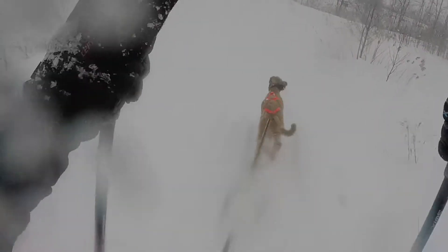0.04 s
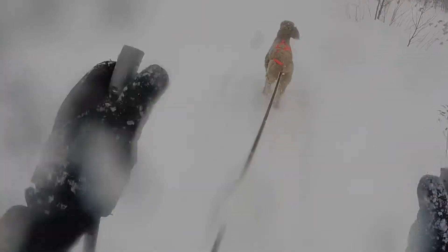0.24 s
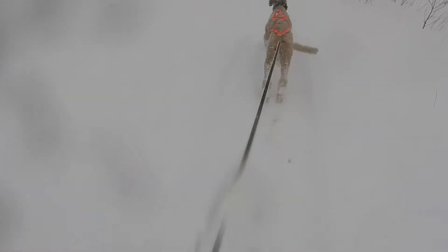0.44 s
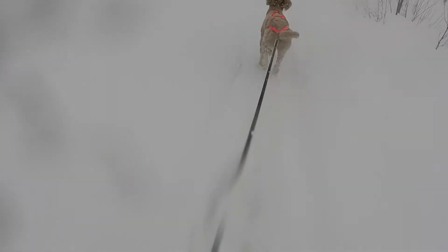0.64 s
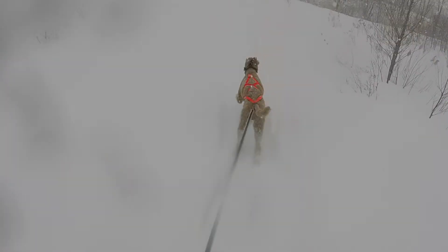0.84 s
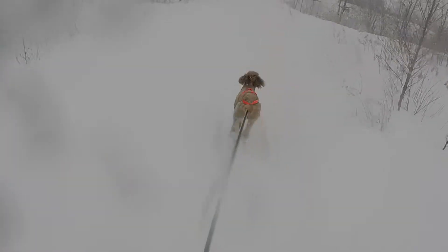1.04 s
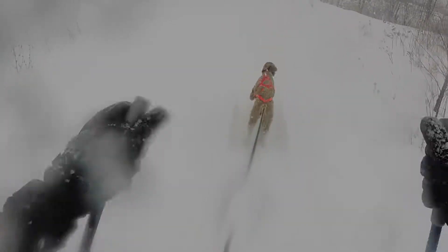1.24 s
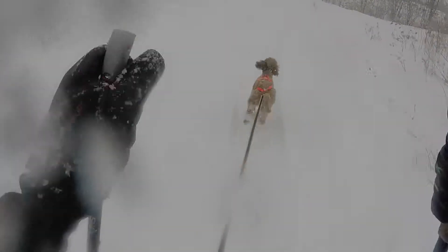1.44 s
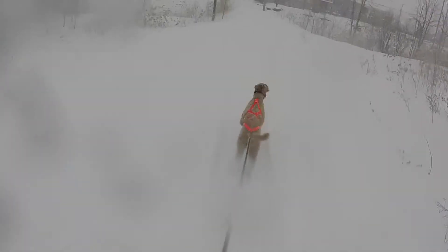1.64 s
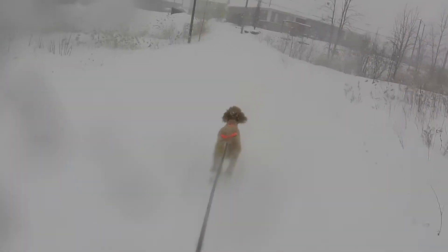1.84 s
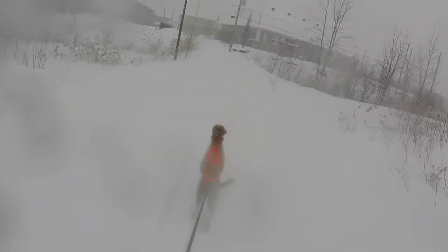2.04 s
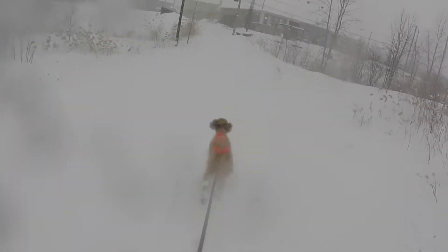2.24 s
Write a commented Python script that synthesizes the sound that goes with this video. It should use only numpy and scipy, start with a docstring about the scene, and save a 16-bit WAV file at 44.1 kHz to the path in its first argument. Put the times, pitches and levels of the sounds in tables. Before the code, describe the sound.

Skiing on snow with short crunches, icy ticks, pole clicks and low wind.

```python
"""Skiing through falling snow

On the slope behind a dog, heard from the microphone of a camera worn on the body.
Icy grains tick on the housing, right at the microphone; at arm's length, poles and gear knock,
click and give a few louder clacks. Underfoot, snow crunches in bursts of tiny fractures and the
skis glide with a soft, grainy hiss. Wind on the microphone lays a low rumble under it all."""
import sys
import numpy as np
from scipy.fft import rfft, irfft, next_fast_len
from scipy.io import wavfile
from scipy.ndimage import uniform_filter1d

SR = 44100
rng = np.random.default_rng(int(sys.argv[2]) if len(sys.argv) > 2 else 0)


def int16_out(signal):
    """Quantize to a 16-bit WAV file."""
    q = np.round(np.clip(np.atleast_2d(signal).T, -1, 1) * 32767)
    wavfile.write(sys.argv[1], SR, q.astype(np.int16))


N = 101429

# wind on the microphone: (time [s], level [dB])
WIND_LEVEL = [(.18, -53), (.3, -39.5), (.39, -38), (.45, -28.5), (.53, -46.5), (.64, -33), (.78, -43.5),
              (.95, -39.5), (1.06, -53), (1.12, -33), (1.2, -44.5), (1.33, -43), (1.55, -45.5), (1.63, -36),
              (1.73, -41), (1.83, -33.5), (1.95, -42.5), (2.3, -47)]
# colour of its rumble: (frequency [Hz], level [dB])
WIND_SPECTRUM = [(14, -9), (36, -1.5), (62, -18.5), (100, -37), (1000, -88)]
# still air over the slope: (frequency [Hz], level [dB])
AIR_SPECTRUM = [(100, 0.5), (500, -10), (3000, -21), (4800, -26), (9000, -32.5), (14500, -35.5),
                (16000, -55)]
# swell of the skis' glide: (time [s], relative level [dB])
GLIDE_LEVEL = [(.18, -64), (.43, -55), (.62, -54), (.8, -61.5), (.98, -59), (1.05, -62), (1.48, -64),
               (1.62, -53), (1.78, -59.5), (1.88, -56.5), (2.13, -63.5), (2.3, -56.5)]
# colour of the glide: (frequency [Hz], level [dB])
GLIDE_SPECTRUM = [(600, -5.5), (1200, -1), (2700, 0.5), (3800, -5.5), (5600, -8.5), (8000, -13),
                  (13000, -22), (16000, -40)]
# snow giving way underfoot: (time [s], length [s], level [dB], brightness [dB/octave])
SNOW_CRUNCHES = [(0.223, 0.0085, -42, -0.5), (0.2454, 0.0072, -40, -5), (.259, 0.0087, -44.5, -10.5),
                 (.522, 0.0072, -42, -10.5), (0.663, .018, -51, -17), (1.545, 0.016, -44.5, 0),
                 (1.872, 0.0045, -40.5, -8)]
# pitched clicks of the gear: (time [s], level [dB], ring [Hz], overtone boost [dB])
GEAR_CLICKS = [(0.2502, -33, 2280, -12), (0.3557, -34.5, 1710, -13), (0.3927, -36.5, 1970, -12),
               (0.4433, -27.5, 2480, 8), (0.4511, -41, 2350, 0), (0.9779, -41.5, 2530, -15),
               (1.9096, -32.5, 2480, -20), (2.2522, -43.5, 3070, -24)]
# their colour before the ring is added: (frequency [Hz], level [dB])
CLICK_SPECTRUM = [(200, -19), (950, -17), (1800, -6), (3800, -9), (5500, -20), (16000, -34)]
# sharp crack of a pole: (frequency [Hz], level [dB])
CRACK_SPECTRUM = [(550, -28), (950, -14.5), (1300, -12), (1760, 2), (2300, -4.5), (3400, -9.5), (4200, -16),
                  (8800, -23.5), (9900, -15), (11300, -32), (13400, -27), (16000, -50)]
# dull knocks of poles planted in snow: (time [s], level [dB])
POLE_KNOCKS = [(.2456, -42), (.2503, -44), (.362, -46), (.667, -46.5), (1.3814, -32), (1.639, -44)]
# their colour: (frequency [Hz], level [dB])
KNOCK_SPECTRUM = [(200, -9), (480, 1), (700, -3), (1120, 3), (1500, -11), (2400, -15), (3400, -33),
                  (9000, -58)]
# contacts in one chattering clack of the gear: (time [s], level [dB])
CLACK_CONTACTS = [(1.5686, -21), (1.5707, -23.5), (1.5745, -31.5)]
# their colour: (frequency [Hz], level [dB])
CLACK_SPECTRUM = [(150, -27), (1450, -25), (1750, -7), (2280, 0), (3000, -8.5), (3800, -16.5), (4600, -11),
                  (5700, -12.5), (6800, -35), (16000, -57)]
# colour of the camera's housing: (frequency [Hz], level [dB])
HOUSING_SPECTRUM = [(150, -11.5), (700, -17.5), (1750, -2), (2500, 2), (3500, 0), (4500, -6.5),
                    (5600, -4.5), (7200, -11), (10000, -12.5), (13500, -16.5), (16000, -27)]
# its faint ring after every blow: (frequency [Hz], relative level [dB], t60 [s])
HOUSING_RING = [(1700, -4.5, 0.038), (2108, -5.5, 0.06), (2590, 3, 0.038), (3450, 0, 0.028),
                (9700, -14, 0.029)]
# icy grains on the housing: (time [s], level [dB], brightness [dB/octave])
ICE_TICKS = [(0.3379, -44, 3), (0.3555, -37, 2), (0.4756, -40.5, 4.5), (0.538, -30.5, 4), (0.5516, -48, 10),
             (0.599, -43, -13), (0.6178, -45.5, 2.5), (0.6402, -45, -3.5), (0.6577, -42, -1.5),
             (0.71, -46.5, 7), (0.7418, -47, 4.5), (0.7612, -44, 3), (0.8168, -38.5, 9), (0.8523, -37, 0),
             (0.923, -38.5, 2), (0.9556, -42, -8), (0.9778, -49, 8), (1.1, -50, 4.5), (1.1893, -37.5, 2.5),
             (1.1927, -42, 5.5), (1.2853, -38.5, -2), (1.301, -43.5, 0), (1.5122, -49, 3.5),
             (1.5348, -41, -1.5), (1.5423, -39.5, 4.5), (1.5917, -34, 3), (1.6422, -40, 0),
             (1.657, -39.5, -2), (1.6967, -39, 2.5), (1.7525, -39, -0.5), (1.7769, -41, 2.5),
             (1.8272, -44.5, -13.5), (1.859, -42.5, 6), (1.8671, -36, -8.5), (1.8694, -33, 0.5),
             (1.8797, -34.5, 19), (1.898, -46.5, 8), (1.9355, -43, -9), (1.985, -48, -1),
             (2.0402, -44.5, 1.5), (2.0892, -45, 1.5), (2.1287, -47, 12), (2.1485, -42, 6),
             (2.2783, -47, 0.5)]

AIR_DB, GLIDE_HISS_DB, GLIDE_GRAINS_DB = -56.5, -8, -2
GRAIN_HZ, GRAIN_SPREAD_OCT, GRAIN_T60_CYCLES, GRAIN_SIZE_DB = 2300, 0.74, 16, 4
RING_DB, TICK_SCATTER_DB, TICK_T60_S = -14.5, 3, 0.0088
TOP_HZ = 16300  # the camera's band limit
SIZE = 4096  # samples in one short sound
HZ = np.fft.rfftfreq(SIZE, 1 / SR)
T = np.arange(SIZE) / SR


def amp(db):
    """Decibels to gain."""
    return 10 ** (np.asarray(db) / 20)


def unit(x):
    """Scale to rms 1."""
    return x / np.sqrt(np.mean(x ** 2) + 1e-20)


def along(spectrum, hz=HZ):
    """A spectrum's level in dB at hz, interpolated on a log frequency axis."""
    points_hz, db = np.transpose(spectrum)
    return np.interp(np.log(hz + 1), np.log(points_hz), db)


def curve(rows):
    """Join (time [s], level [dB]) points into one level per sample."""
    return np.interp(np.arange(N) / SR, *np.transpose(rows))


def coloured(x, spectrum):
    """Filter a long sound to the given spectrum, at rms 1."""
    padded = next_fast_len(N + 2 * SIZE)
    gain = amp(along(spectrum, np.fft.rfftfreq(padded, 1 / SR)))
    return unit(irfft(rfft(x, padded) * gain, padded)[:N])


def struck(force, colour_db):
    """Causal answer of a body of this colour to a short force."""
    cepstrum = irfft(np.log(amp(colour_db)))
    cepstrum[1:SIZE // 2] *= 2  # fold to minimum phase
    cepstrum[SIZE // 2 + 1:] = 0
    return unit(irfft(rfft(force) * np.exp(rfft(cepstrum))))


def add(out, s, sound, db, length=0.005):
    """Mix in a short sound at s seconds, with the energy of db held for length seconds."""
    start = int(np.clip(round(s * SR), 0, N - 1))
    out[start:start + SIZE] += (amp(db) * unit(sound) * np.sqrt(length * SR / SIZE))[:N - start]


def blow(colour_db, scatter_db, scatter_t60):
    """One contact, its quickly dying scatter inside the body, and the ring of the housing."""
    contact = unit(1.0 * (T == 0))
    scatter = unit(rng.standard_normal(SIZE) * amp(-60 * T / scatter_t60))
    body = struck(contact + amp(scatter_db) * scatter, colour_db)
    hz, db, t60 = np.transpose(HOUSING_RING)[:, :, None]
    db = db + np.interp(hz, HZ, colour_db) + rng.normal(0, 3.2, hz.shape)
    detune = rng.normal(1, 0.01, hz.shape)
    modes = amp(db - 60 * T / t60) * np.sin(2 * np.pi * hz * T * detune)
    return body + amp(RING_DB) * unit(modes.sum(0))


def housing(brightness):
    """The housing's colour, tilted: harder, smaller grains favour its upper resonances."""
    octaves = np.log2(np.clip(HZ, 1500, 11000))
    return along(HOUSING_SPECTRUM) + brightness * (octaves - octaves.mean())


def air():
    """Still air all around: a faint, steady rush."""
    return amp(AIR_DB) * coloured(rng.standard_normal(N), AIR_SPECTRUM)


def wind():
    """Slow buffets right on the microphone make a low rumble."""
    rumble = coloured(rng.standard_normal(N), WIND_SPECTRUM)
    local_rms = np.sqrt(np.abs(uniform_filter1d(rumble ** 2, size=SR // 10)))
    return amp(curve(WIND_LEVEL)) * unit(rumble / local_rms)


def glide(grains_per_s=220):
    """Skis sliding underfoot: crumbling grains, each with its own pitch, over a faint hiss."""
    grains, count = np.zeros(N), int(grains_per_s * N / SR)
    hiss = amp(GLIDE_HISS_DB) * coloured(rng.standard_normal(N), GLIDE_SPECTRUM)
    for k, (late, pitch, size) in enumerate(rng.standard_normal((count, 3))):
        cycles = T * min(GRAIN_HZ * 2 ** (GRAIN_SPREAD_OCT * pitch), TOP_HZ)
        grain = np.sin(2 * np.pi * cycles) * amp(-60 * cycles / GRAIN_T60_CYCLES)
        add(grains, abs(k + late) / grains_per_s, grain, GRAIN_SIZE_DB * min(size, 1))
    crumble = amp(GLIDE_GRAINS_DB) * coloured(grains, GLIDE_SPECTRUM)
    return amp(curve(GLIDE_LEVEL)) * (hiss + crumble)


def crunches(fractures_per_s=1500, release_t60=0.014):
    """Snow gives way under the skis in short bursts of tiny fractures, coloured by the housing."""
    out = np.zeros(N)
    for s, length, db, brightness in SNOW_CRUNCHES:
        strength = rng.standard_normal(SIZE)
        fractures = (rng.random(SIZE) < fractures_per_s / SR) | (T == 0)
        envelope = amp(-60 * np.maximum(T - length, 0) / release_t60)
        add(out, s, struck(strength * fractures * envelope, housing(brightness)), db, length)
    return out


def gear_clicks(peak_db=14, half_width_hz=160, overtone_ratio=1.5):
    """Gear tapping close by: each blunt contact rings briefly at one pitch and an overtone."""
    out = np.zeros(N)
    resonance = lambda hz: 1 / (1 + ((HZ - hz) / half_width_hz) ** 2)
    for s, db, hz, overtone_db in GEAR_CLICKS:
        peaks = amp(peak_db) * resonance(hz) + amp(overtone_db) * resonance(overtone_ratio * hz)
        colour_db = along(CLICK_SPECTRUM) + 20 * np.log10(1 + peaks)
        add(out, s, blow(colour_db, scatter_db=-6, scatter_t60=0.011), db)
    return out


def gear_clack():
    """Gear chatters close by: contacts milliseconds apart merge into one loud clack."""
    out = np.zeros(N)
    for s, db in CLACK_CONTACTS:
        add(out, s, blow(along(CLACK_SPECTRUM), scatter_db=1.5, scatter_t60=0.015), db)
    return out


def poles(crack_s=1.253, crack_db=-18):
    """Poles at arm's length: one sharp crack, and dull knocks as they are planted in snow."""
    out = np.zeros(N)
    add(out, crack_s, blow(along(CRACK_SPECTRUM), scatter_db=-6, scatter_t60=0.017), crack_db)
    for s, db in POLE_KNOCKS:
        add(out, s, blow(along(KNOCK_SPECTRUM), scatter_db=-9.5, scatter_t60=0.03), db)
    return out


def ice_ticks(fine_per_s=45, fine_boost_db=5.5):
    """Icy grains hit the housing at the microphone; fine ones fall at random, louder with the glide."""
    out, glide_db = np.zeros(N), curve(GLIDE_LEVEL)
    for s, db, brightness in ICE_TICKS:
        add(out, s, blow(housing(brightness), TICK_SCATTER_DB, TICK_T60_S), db)
    for when, faintness, hardness in rng.random((int(fine_per_s * N / SR), 3)):
        db = glide_db[int(when * N)] + fine_boost_db - 7 * faintness
        add(out, when * N / SR, blow(housing(9 * hardness - 5), TICK_SCATTER_DB, TICK_T60_S), db)
    return out


def scene():
    """All sources at the one body-worn microphone."""
    impacts = ice_ticks() + gear_clicks() + poles() + gear_clack()
    return (impacts + crunches() + glide() + wind() + air())[None]


def record(dry):
    """The camera keeps nothing above its band limit."""
    padded = next_fast_len(N + 2 * SIZE)
    passband = np.fft.rfftfreq(padded, 1 / SR) < TOP_HZ
    return irfft(rfft(dry, padded) * passband, padded)[:, :N]


dry = scene()
out = record(dry)
int16_out(out)
```